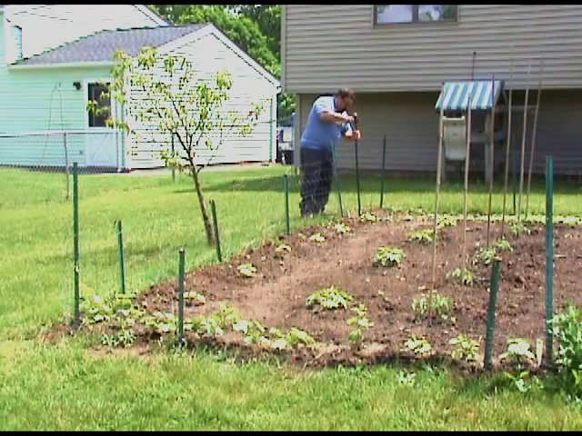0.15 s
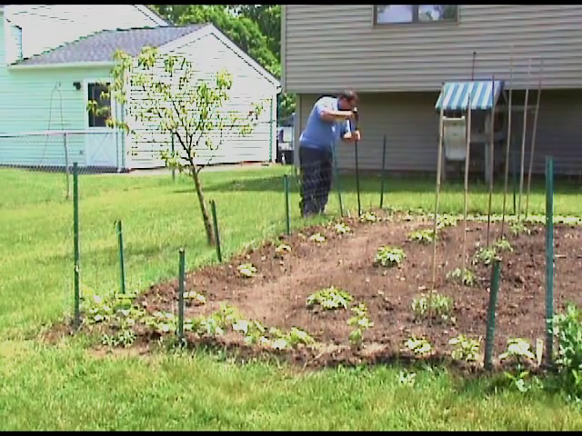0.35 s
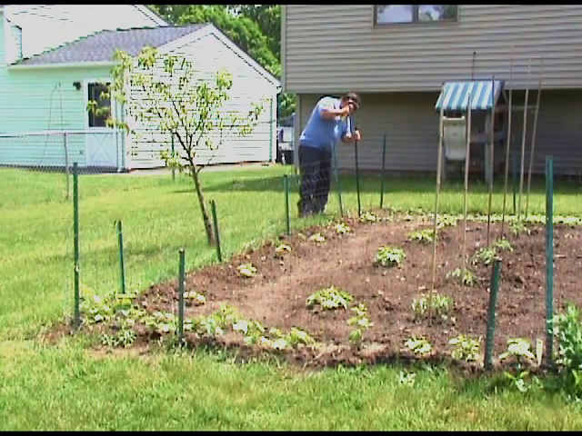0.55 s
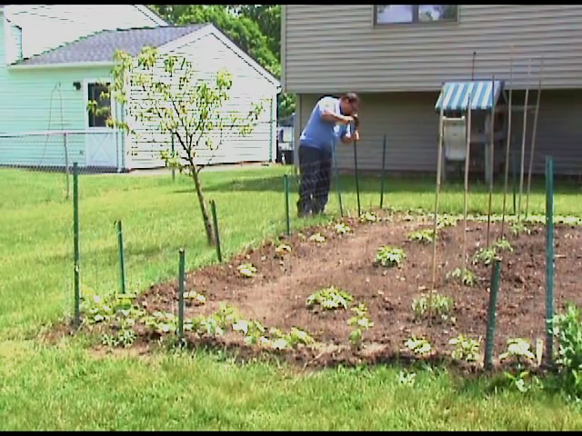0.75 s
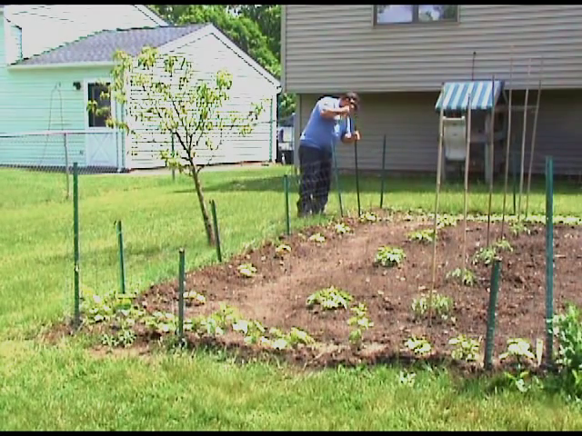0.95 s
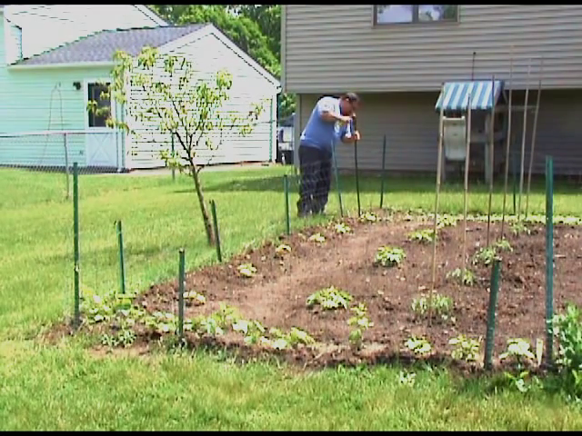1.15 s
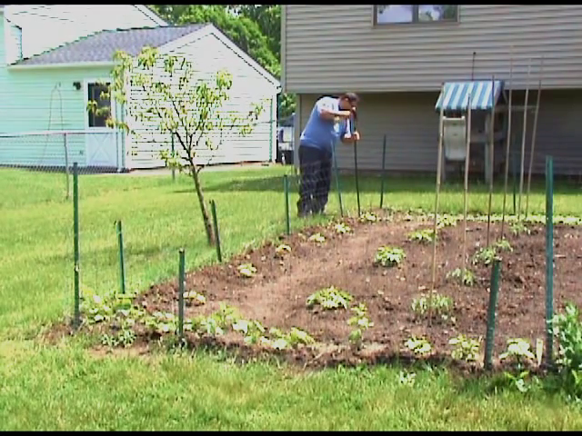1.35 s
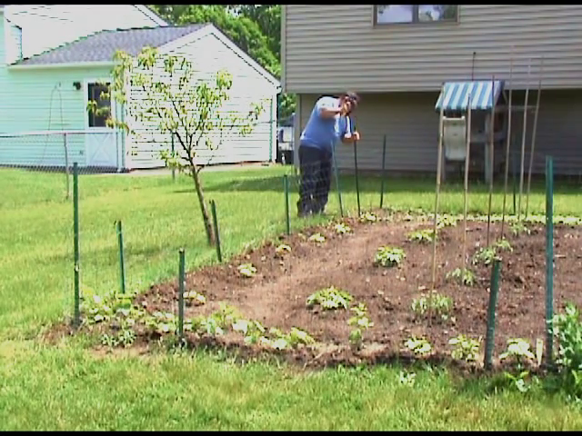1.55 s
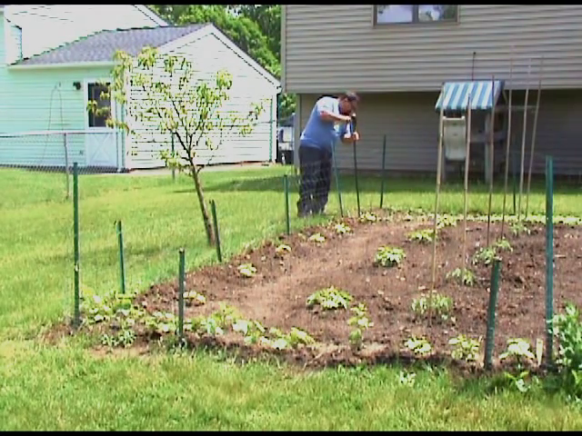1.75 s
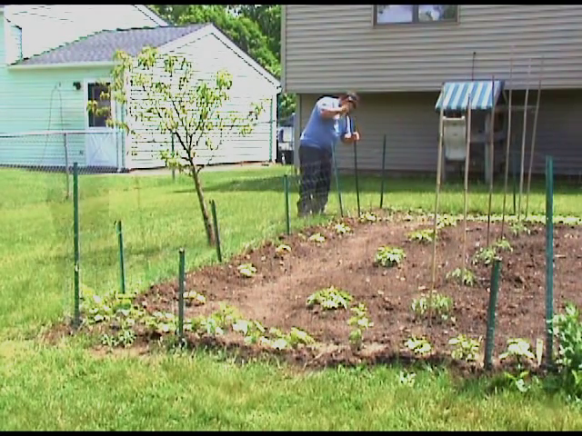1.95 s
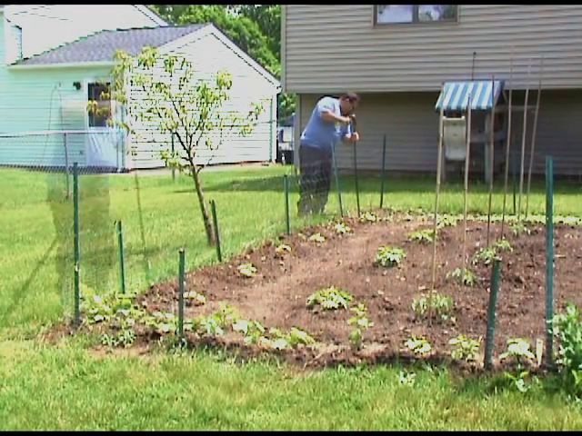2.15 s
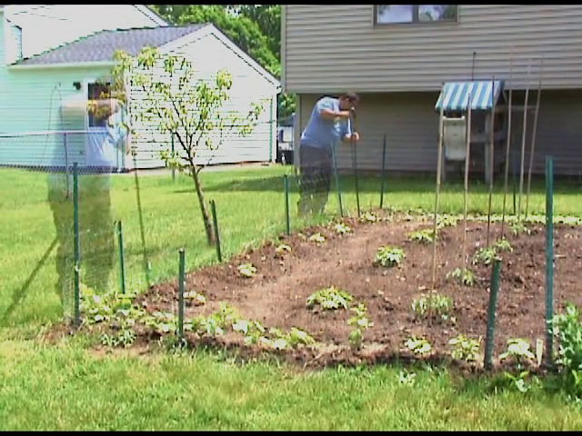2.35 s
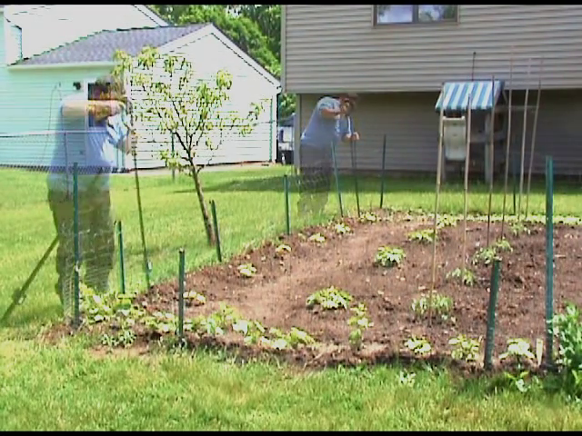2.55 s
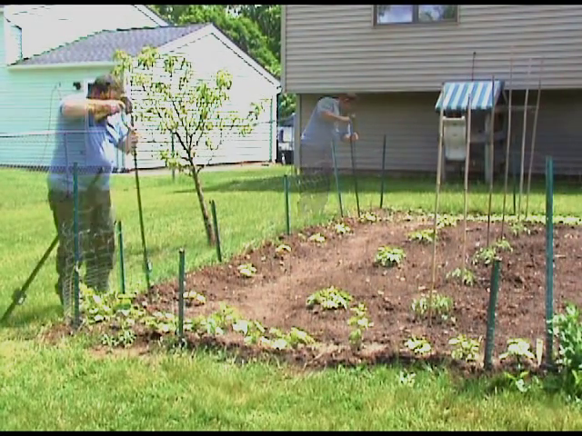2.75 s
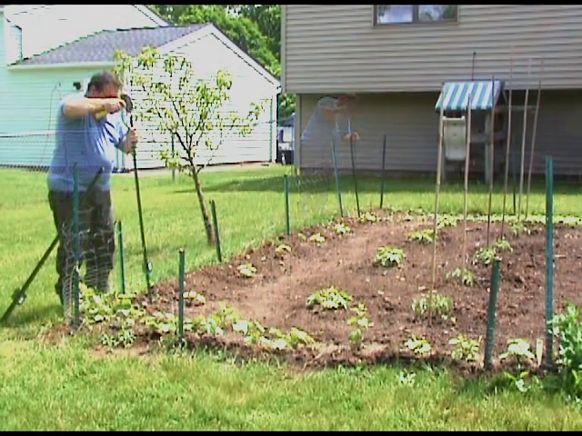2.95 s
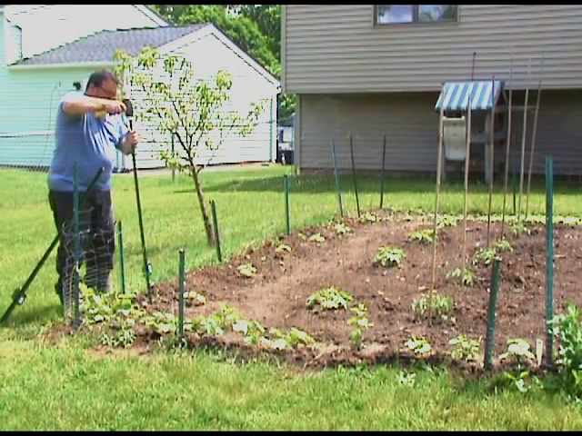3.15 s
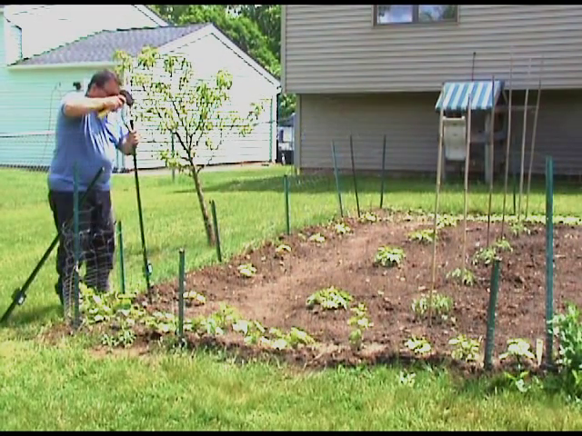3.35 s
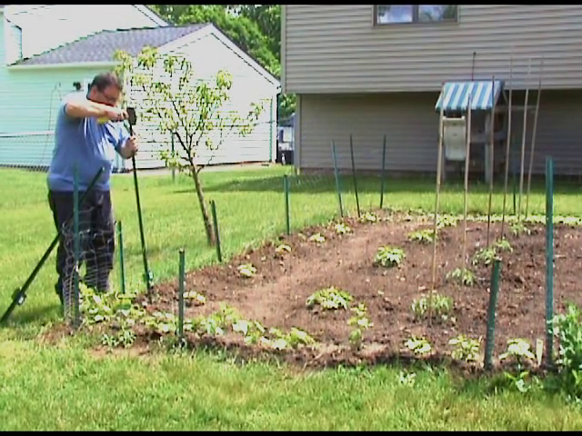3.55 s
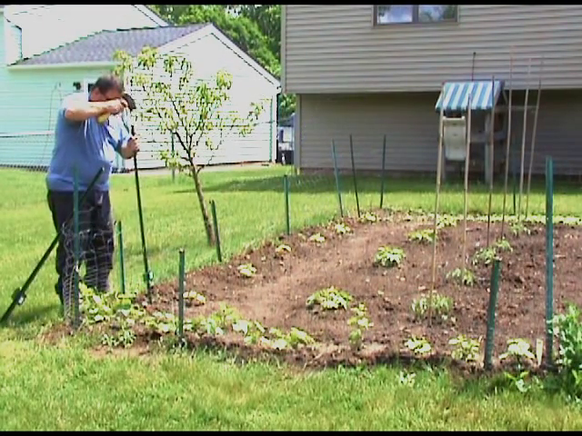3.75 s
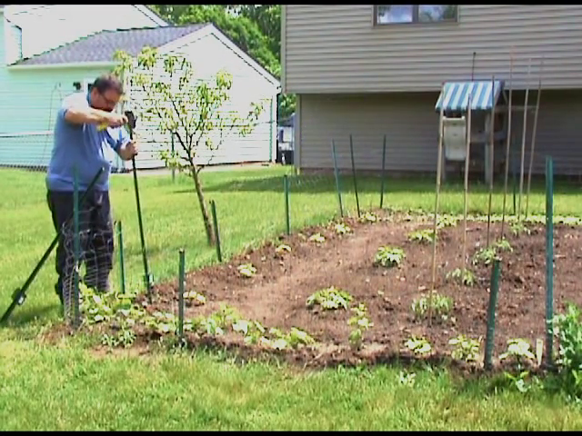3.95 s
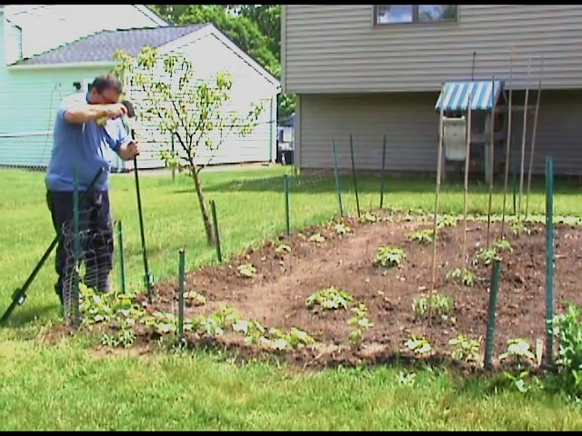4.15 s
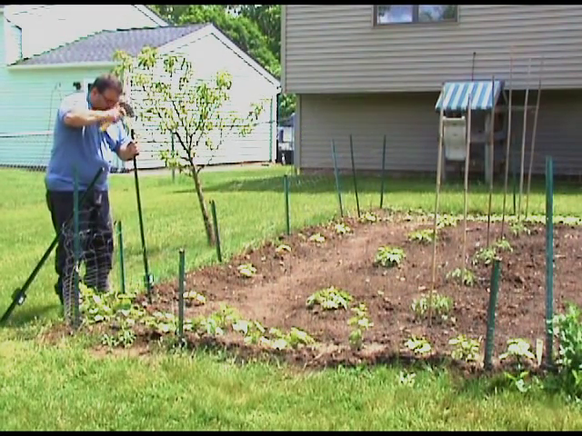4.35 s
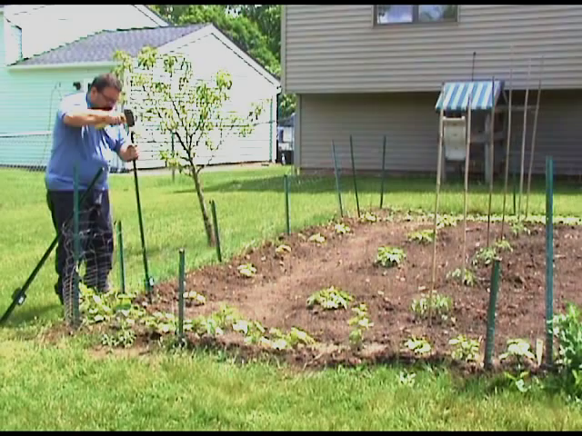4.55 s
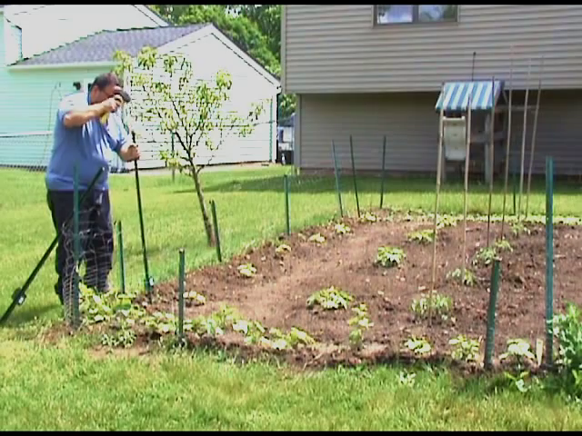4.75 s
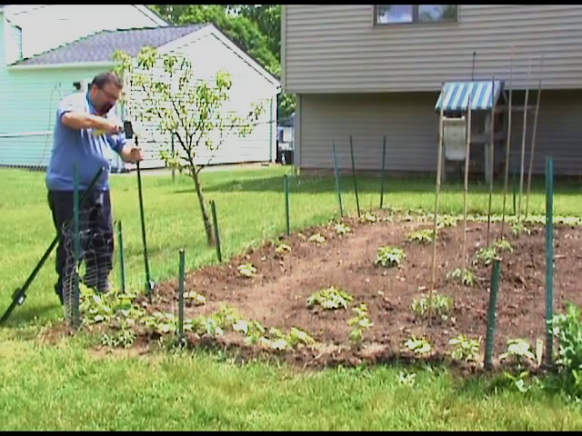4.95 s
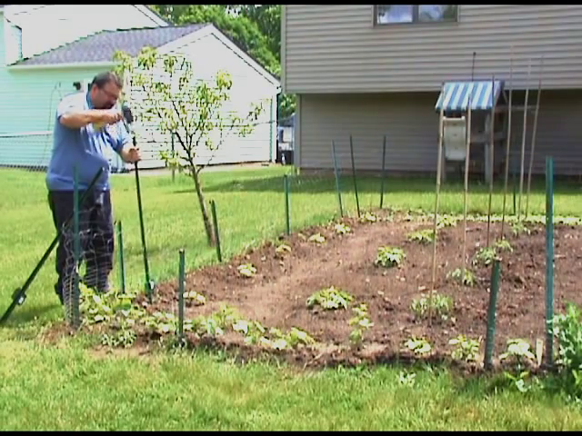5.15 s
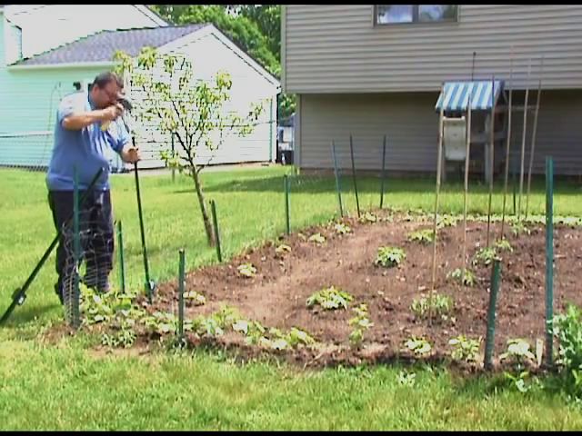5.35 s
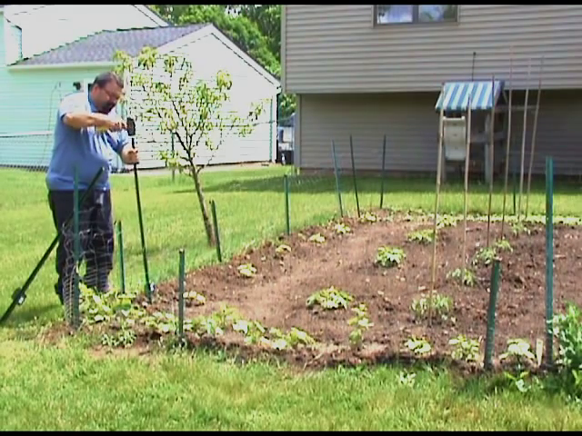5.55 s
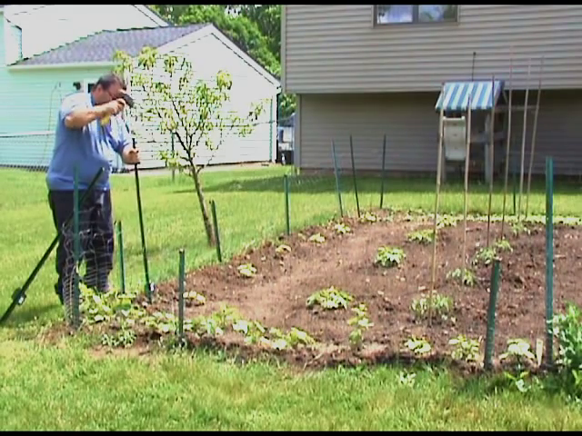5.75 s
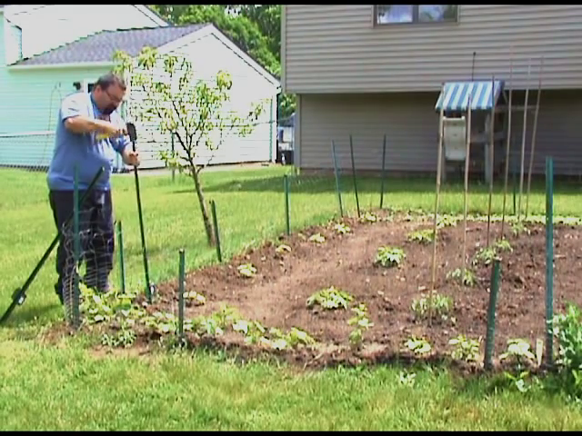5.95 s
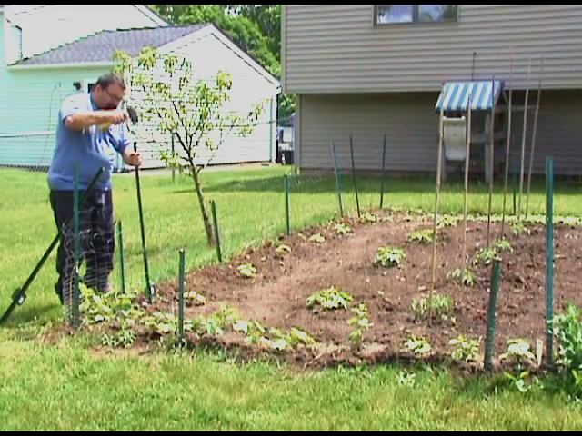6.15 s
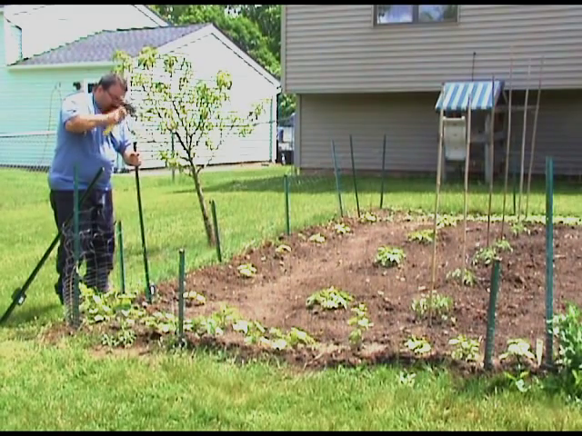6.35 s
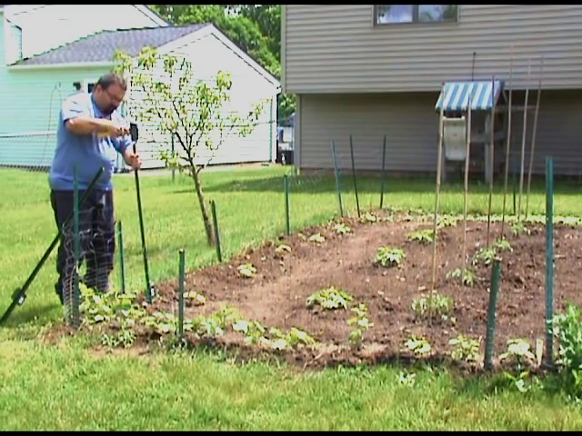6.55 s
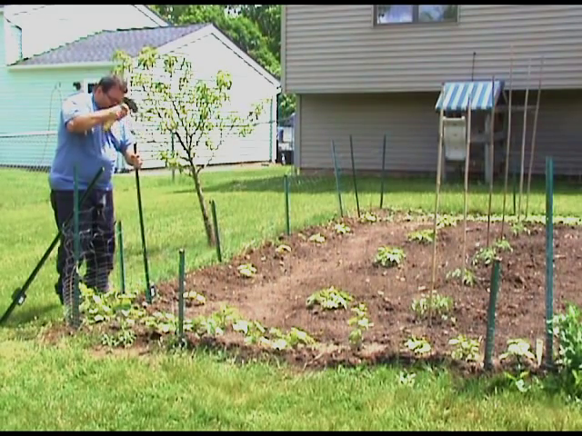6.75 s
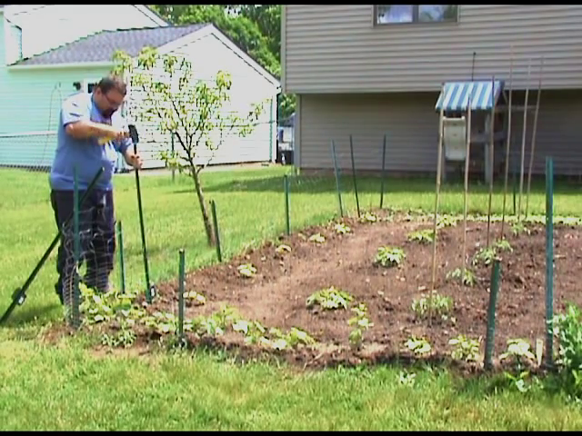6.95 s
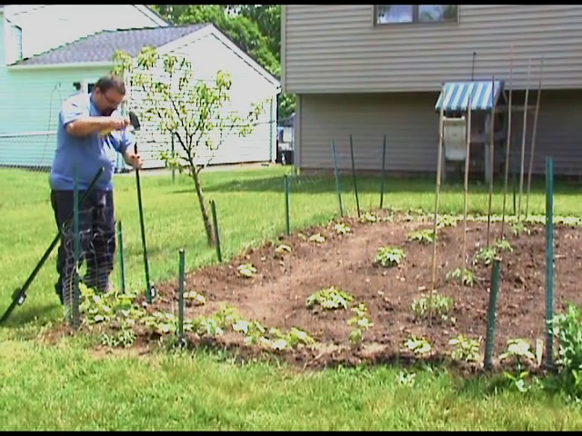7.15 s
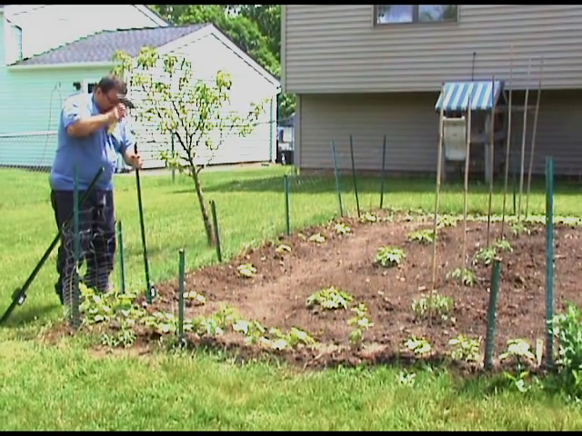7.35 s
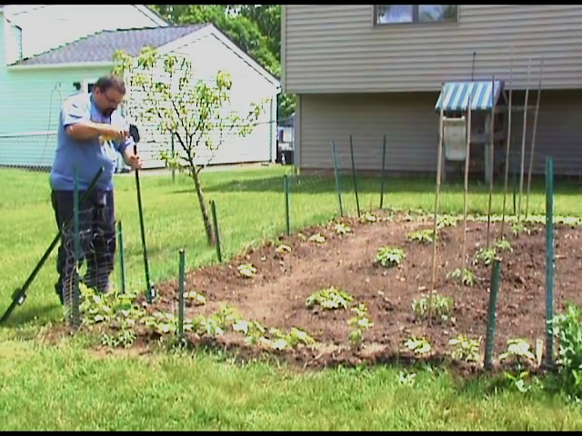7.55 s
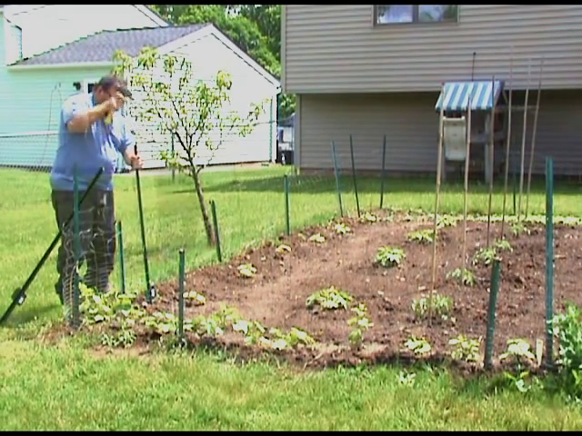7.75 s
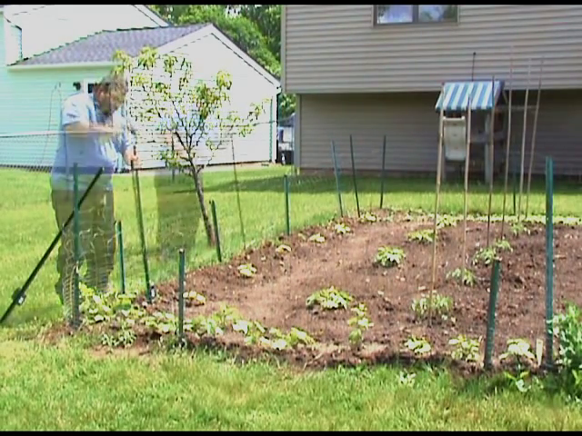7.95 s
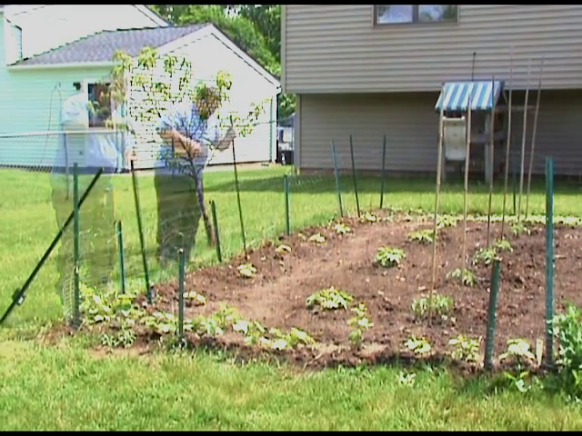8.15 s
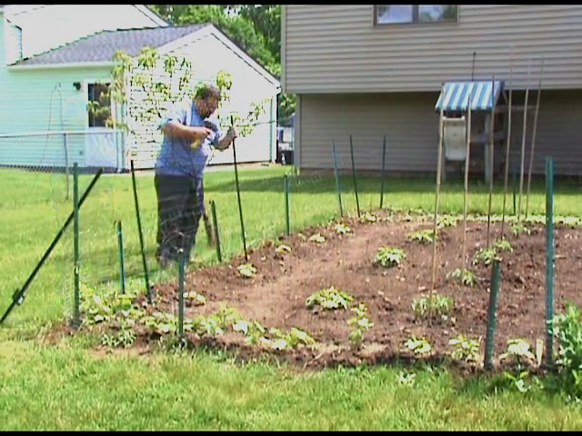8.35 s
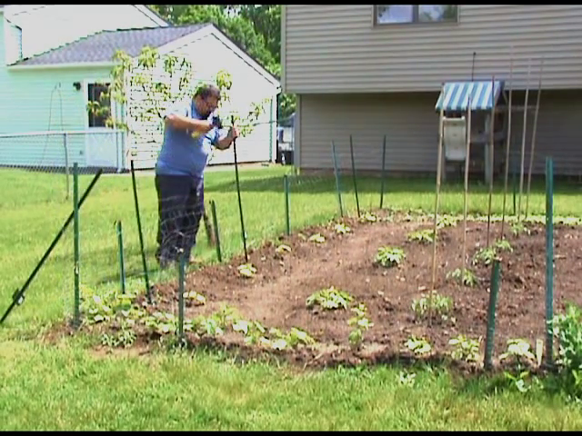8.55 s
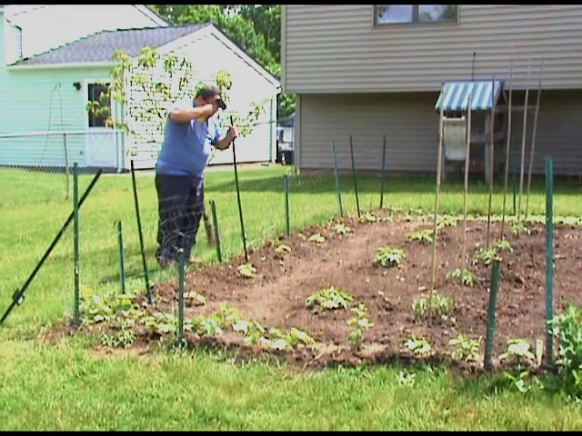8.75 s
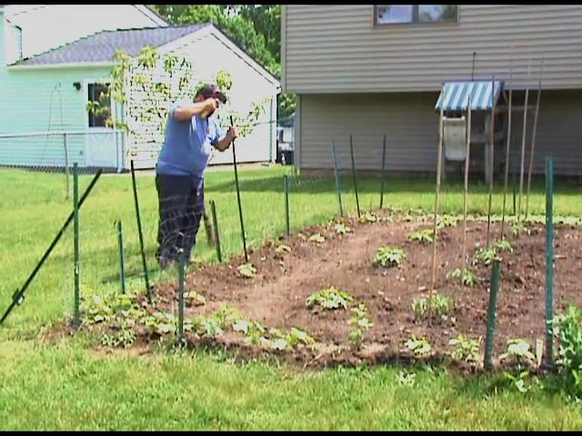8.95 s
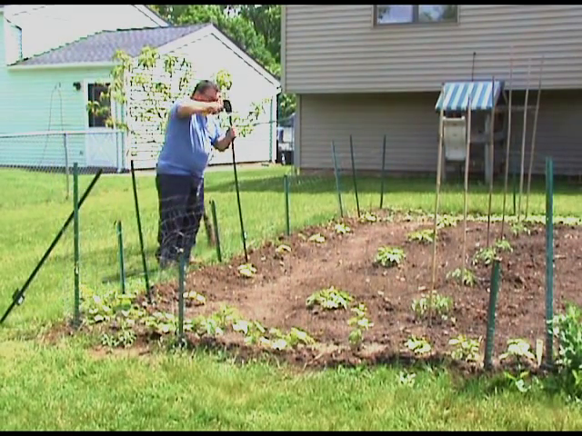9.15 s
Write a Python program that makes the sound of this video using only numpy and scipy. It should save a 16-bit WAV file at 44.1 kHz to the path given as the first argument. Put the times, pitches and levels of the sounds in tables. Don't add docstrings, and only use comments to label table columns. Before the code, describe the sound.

Outdoors in a yard between houses, the tail of an earlier blow fades at the start. From 0.3 s a hammer strikes a farther steel post every half second: hard, short, chattering clanks with hollow notes, small soil thuds and tight wall slaps, seven blows ending with a light tap at 3.3 s. A faint low motor idles and swells beneath, stopping around 2.8 s. At 3.15 s a nearer post enters softly, then full blows from 3.6 s to 8.1 s, roughly two per second, brighter and longer ringing, strongest near 6.1 and 7.6 s, each with a thin outdoor echo. Tiny chirps flick by at 3.8, 6.9 and 8.5 s; faint low engine drones pass around 5.3-6.6 and 6.9-8.2 s. Distant traffic and low wind rumble continue throughout, gusting near 3, 7.3 and 8.2 s. After the last blow its ring dies into quiet open air.

```python
import sys
import numpy as np
from scipy import signal
from scipy.fft import rfft, irfft
from scipy.io import wavfile
from scipy.ndimage import uniform_filter1d

SR = 44100
rng = np.random.default_rng(int(sys.argv[2]) if len(sys.argv) > 2 else 0)


def magnitude_from_level(level_db):
    exponent = np.asarray(level_db, float) / 20
    return 10 ** exponent


def dump(signal):
    limited = np.clip(np.atleast_2d(signal).T, -1, 1)
    pcm = np.round(limited * 32767).astype(np.int16)
    wavfile.write(sys.argv[1], SR, pcm)


N = 405719
LEAD = SR // 4
HIT = SR // 2
SHORT = HIT // 8
BURST = HIT // 4

# start in seconds, peak level in dB, then hammer ring, post body and
# brightness in dB against the peak band.
FAR_BLOWS = [
    (0.3114, -7.5, -13.5, -16.5, -16.5),
    (0.8144, -12, -14.5, -15, -19),
    (1.3179, -7, -20, -16.5, -18.5),
    (1.814, -8, -35, -31, -16.5),
    (2.3036, -8, -16, -17.5, -19),
    (2.803, -12.5, -17, -17.5, -18.5),
    (3.2954, -21, -20, -14.5, -19.5),
]
NEAR_BLOWS = [(3.1574, -25.5, -6.5, -10, -16.5), (3.5855, -12.5, -13, -13.5, -16),
              (4.0532, -7, -15, -16, -16.5), (4.5427, -9, -7.5, -13.5, -13.5),
              (5.0473, -5.5, -9.5, -16.5, -16.5), (5.5782, -7, -6, -10.5, -15.5),
              (6.072, -3, -14.5, -21.5, -17.5), (6.5681, -5, -14, -18, -11.5),
              (7.0791, -10, -14.5, -8, -13), (7.5845, -4.5, -26.5, -16, -14),
              (8.111, -9, -22, -12.5, -11.5)]
EARLIER_BLOW = (-.1925, -4, -19, -13, -8)
# frequency in Hz, level in dB, T60 in seconds.
POST_MODES = [(991, 7, 0.12), (1495, 13, 0.096), (1920, 6, 0.055), (2020, 11.5, 0.03), (2250, -14, .04),
              (2530, 0, 0.04), (2898, 2, 0.28), (3213, -0.5, 0.36), (3370, 2.5, 0.41), (3440, -4.5, 0.037),
              (3736, -12, 0.017), (4096, -3, 0.0064), (4510, -3, 0.0088), (4890, -6.5, 0.038),
              (5000, -9.5, 0.059), (5140, 5.5, 0.13), (5474, 1.5, 0.09), (5545, -15.5, 0.14),
              (6000, 2, 0.015), (6360, -10, 0.0073), (7040, -1, 0.0059), (7130, -5.5, 0.12),
              (7760, 0.5, 0.02), (8440, -0.5, 0.016), (8780, 0.5, 0.019), (9670, -2.5, 0.012),
              (10400, -39.5, 0.034), (12600, -41, .03), (13000, -41, .06), (13300, -25, .08)]
# frequency in Hz, level in dB.
HAMMER_PARTIALS = [(4136, 0), (4160, -8), (5670, -21.5), (12750, -46)]
# start in seconds, peak level in dB, frequency in Hz.
BENDS = [(0.3107, -11, 2130), (0.8138, -14, 1840), (1.3184, -20, 2210), (1.813, -21.5, 1590),
         (2.3032, -12.5, 2000), (2.8014, -18, 1960), (3.1562, -20, 1900), (3.2959, -23, 1500),
         (3.5862, -6.5, 1904), (4.0532, -13.5, 1990), (4.5446, -5, 2006), (5.0479, -7.5, 2174),
         (5.5774, -6.5, 1920), (6.0716, -13, 2530), (6.5698, -20.5, 2500), (7.0788, -4.5, 2240),
         (7.5842, -5, 2247), (8.11, -7, 2530), (0.8165, -4, 4170), (1.816, -6.5, 4400), (5.048, -9, 3280),
         (7.5845, -25, 3420)]
# start in seconds, peak level in dB, centre in Hz,
# level of the upper knock in dB.
THUDS = [(0.313, -29, 301, -50), (0.811, -22, 129, -6), (1.318, -22, 124, -9.5), (1.813, -24, 129, -9),
         (2.303, -22, 127, -16), (2.803, -27, 129, -9), (4.545, -46, 116, 11), (6.571, -32.5, 328, -25),
         (7.077, -22, 132, -34), (7.579, -23.5, 127, -13), (8.11, -27, 161, -28)]
# delay in seconds, level in dB, smear in seconds,
# left minus right in dB.
FAR_WALLS = [(.029, -9, 0.0066, -0.5), (.034, -18, 0.0077, -1), (.072, -28.5, 0.0085, 10),
             (.113, -31.5, 0.0051, 1), (.210, -28.5, 0.0009, 5.5), (.247, -53.5, 0.0079, 36),
             (.283, -33, 0.018, -2), (.298, -41.5, 0.023, -1), (.355, -46, 0.025, 5)]
NEAR_WALLS = [(.022, -42, 0.0032, -8), (.054, -18.5, 0.0052, 0), (.105, -30.5, 0.017, 2),
              (.133, -34, 0.009, 7), (.166, -32, 0.014, 5), (.209, -29, 0.0045, 5.5),
              (.240, -40, .006, -1.5), (.283, -37, .010, 0), (.297, -38, .010, -3.5),
              (.345, -45, 0.012, -3)]
# centre in Hz, level in dB, T60 in seconds.
YARD_TAIL = [(500, -26.5, 0.099), (1000, -32.5, 0.47), (1750, -23, 1), (4120, -18, 0.95), (7500, -20, 0.64),
             (12600, -8, 0.36)]
# start in seconds, length in seconds, level in dB.
SURGES = [
    (-.2, 0.57, -41),
    (0.567, 0.9, -47),
    (1.356, 0.26, -57),
    (1.67, 0.18, -47),
    (2.04, 0.63, -48.5),
]
# multiple of the base note, level in dB.
HUM_ORDERS = [(1, 0), (2, -17), (3, -20)]
# start in seconds, length in seconds, frequency in Hz, level in dB.
DRONES = [
    (6.9, 1.3, 121, -50),
    (6.9, 1.3, 240, -56),
    (5.3, 1.3, 77, -51),
]
# start in seconds, length in seconds, from Hz, to Hz, level in dB.
CHIRPS = [(3.794, .018, 3100, 3600, -51), (3.826, .018, 3250, 3750, -55), (3.852, .012, 3500, 3200, -53),
          (6.911, .012, 4300, 5200, -47), (6.925, .012, 4900, 4500, -49), (6.936, .016, 4000, 5400, -44),
          (6.951, .013, 5400, 3900, -46), (6.957, .018, 3200, 3550, -46), (6.969, .014, 4150, 4400, -45),
          (6.992, .014, 3350, 3700, -48), (8.418, .03, 4150, 3750, -54), (8.45, .014, 3750, 4050, -53),
          (8.472, .02, 3250, 3150, -57), (8.555, .03, 3200, 2900, -57)]
# frequency in Hz, level in dB per Hz.
AIR_COLOUR = [(15, -41), (25, -18), (71, -3), (97, -5), (150, -4.5), (176, -15), (234, 0), (311, -18.5),
              (437, -15.5), (597, -13.5), (754, -10), (1170, -10.5), (2840, -22.5), (8460, -39.5),
              (12500, -37), (16200, -61.5), (22000, -120)]
# frequency in Hz, side minus mid in dB.
AIR_SIDE = [(30, -10), (60, -7), (120, -8), (300, -12), (700, -10), (1500, -8), (3000, -7), (6000, -6),
            (12000, -14)]
# time in seconds, level in dB against its usual level.
TRAFFIC = [(0, 0), (1.6, -1.5), (2.5, 1), (3.5, 2), (4.8, 1), (6.5, 2), (7.6, 3), (8.5, 0.9), (9.2, 0.3)]
# middle in seconds, length in seconds, level in dB over calm.
GUSTS = [
    (0.406, 0.34, 6),
    (1.2, 0.94, 4.5),
    (2.038, 0.29, 8),
    (2.95, 0.73, 12.5),
    (3.5, 0.2, 2),
    (5.693, 0.39, 4.5),
    (6.3, 1.1, 2.5),
    (7.3, 0.88, 12),
    (8.15, 1.04, 18),
]


def fade(length, t60):
    return np.exp(-np.log(1000) * np.arange(length) / (np.maximum(t60, .002) * SR))


def band(x, lo_hz, hi_hz):
    return signal.sosfilt(signal.butter(2, [lo_hz, min(hi_hz, .45 * SR)], "bandpass", fs=SR, output="sos"), x)


def unit(x):
    return x / np.sqrt(np.mean(x ** 2))


def walk(rate, size=N):
    hold = int(SR / rate)
    steps = np.repeat(rng.standard_normal(size // hold + 1), hold)
    return 1.3 * uniform_filter1d(uniform_filter1d(steps, hold), hold)[:size]


def hammer_ring(ring_db, ring_t60):
    t = np.arange(HIT) / SR
    phases = 2 * np.pi * rng.random(len(HAMMER_PARTIALS))
    swing = walk(45, size=HIT)
    wobble = .9 * swing[::-1]
    ring = sum(magnitude_from_level(db) * np.sin(2 * np.pi * hz * t + phase + wobble)
               for (hz, db), phase in zip(HAMMER_PARTIALS, phases))
    ring = magnitude_from_level(ring_db + 6.0) * ring * fade(HIT, ring_t60) * (1 - fade(HIT, 0.0073))
    return ring * magnitude_from_level(1.8 * swing)


def post_colour(bins, ring_db, body_db, bright_db):
    hz, db, t60 = np.repeat(np.transpose(POST_MODES), 3, axis=1)
    hz = hz * (1 + .018 * rng.standard_normal(len(hz)))
    db = db + np.interp(np.log(hz), np.log([2300, 2900, 5390, 6700]), [body_db, 0, 0, bright_db + 4.5])
    lasting = .45
    width = np.log(1000) / (2 * np.pi * lasting * t60)
    peaks = (magnitude_from_level(db) * width)[:, None] ** 2 / (width[:, None] ** 2 + (bins - hz[:, None]) ** 2)
    dull_db = np.clip(.55 * (ring_db + 11.0), -5, 9)
    return np.sqrt(np.sum(peaks, axis=0)) * magnitude_from_level(np.interp(bins, [9500, 11500], [0, -dull_db]))


def blow(ring_db, body_db, bright_db, ring_t60, chatter_t60):
    scrape = rng.laplace(size=SHORT) * fade(SHORT, chatter_t60) * (1 - fade(SHORT, 0.013))
    chatter = rfft(scrape, 2 * SHORT)
    bins = np.arange(len(chatter)) * SR / (2 * SHORT)
    colour = post_colour(bins, ring_db, body_db, bright_db)
    ring = hammer_ring(ring_db, ring_t60)
    out = np.array([ring, magnitude_from_level(-8.5) * ring])
    for k, even in enumerate((.35, .75)):
        post = band(irfft(colour * chatter / np.abs(chatter) ** even)[:SHORT], 570, 13000)
        out[k, :SHORT] += magnitude_from_level(20.5) * post / np.sqrt(np.sum(band(post, 2400, 8000) ** 2))
    return out


def ports(x, pan_db, lean_db, lead_db):
    treble = magnitude_from_level(lean_db) * band(x, 5500, 11000)
    side = treble + magnitude_from_level(lead_db) * (np.roll(x, -2) - np.roll(x, 2))
    return x * magnitude_from_level(np.array([[pan_db], [-pan_db]]) / 2) + side * np.array([[1], [-1]])


def hammering(blows, response, aim, chatter_t60, ring_t60):
    dry = np.zeros((2, LEAD + N + HIT))
    for s, peak_db, *colour in blows:
        start = LEAD + int((s - .0015) * SR)
        free_t60 = ring_t60 * np.exp(.04 * peak_db)
        dry[:, start:start + HIT] += magnitude_from_level(peak_db) * blow(*colour, free_t60, chatter_t60)
    direct = ports(dry[0], *aim)
    return direct[:, LEAD:LEAD + N] + signal.fftconvolve(dry[1:], response, axes=1)[:, LEAD:LEAD + N]


def bends():
    out, t = np.zeros(N + HIT), np.arange(BURST) / SR
    for s, peak_db, hz in BENDS:
        note = np.sin(2 * np.pi * hz * t) * fade(BURST, 0.029) * (1 - fade(BURST, 0.021))
        out[int(s * SR):int(s * SR) + BURST] += magnitude_from_level(peak_db) * note
    return out[:N]


def thuds():
    out = np.zeros(N + HIT)
    for s, peak_db, hz, knock_db in THUDS:
        push = rng.standard_normal((2, BURST))
        thump = band(push[0] * fade(BURST, 0.072) * (1 - fade(BURST, 0.016)), hz / 3.04, hz * 1.46)
        thump = band(thump, 88, 4 * hz)
        knock = band(push[1] * fade(BURST, 0.057), 330, 800)
        both = thump / np.abs(thump).max() + magnitude_from_level(knock_db) * knock / np.abs(knock).max()
        out[int(s * SR):int(s * SR) + BURST] += magnitude_from_level(peak_db + 2.5) * both
    return np.array([out[:N], np.roll(out, 12)[:N]])


def yard(walls, tail_db, wide):
    length = 3 * SR // 4
    out = np.zeros((2, length))
    spread = np.array([[1, wide], [1, -wide]])
    for delay, db, smear, lean_db in walls:
        slap = rng.standard_normal((2, BURST)) * fade(BURST, 4 * smear)
        slap = band(spread @ slap, 300 + 5500 * delay, 14000 / (1 + 6 * delay))
        slap = slap / np.sqrt(np.sum(slap ** 2, axis=1, keepdims=True))
        start = int(delay * SR)
        out[:, start:start + BURST] += slap * magnitude_from_level(db + np.array([[lean_db], [-lean_db]]) / 2)
    for hz, db, t60 in YARD_TAIL:
        noise = spread @ rng.standard_normal((2, length))
        scatter = unit(band(noise, hz / np.sqrt(2), hz * np.sqrt(2)))
        out += magnitude_from_level(db + tail_db - 34.5) * scatter * fade(length, t60) * (1 - fade(length, 0.026))
    return out


def hum():
    t = np.arange(N) / SR
    base_hz = 58.4 - 2.34 * np.maximum(t - 0.95, 0)
    turn = 2 * np.pi * np.cumsum(base_hz) / SR

    def edge(x):
        return np.clip(x / 0.1, 0, 1)

    load = sum(magnitude_from_level(db) * edge(t - s) * edge(s + length - t) for s, length, db in SURGES)
    idle = magnitude_from_level(-49) * edge(2.8 - t)
    load = (load + idle) * magnitude_from_level(0.95 * walk(7.98))
    return np.sqrt(2) * load * sum(magnitude_from_level(db) * np.sin(k * turn) for k, db in HUM_ORDERS)


def drones():
    t, out = np.arange(N) / SR, 0
    for s, length, hz, db in DRONES:
        swell = np.sin(np.pi * np.clip((t - s) / length, 0, 1)) ** .5 * magnitude_from_level(db + 2.5 * walk(9.4))
        wavering_hz = hz * (1 + 0.0117 * walk(3.7))
        out = out + swell * np.sin(2 * np.pi * np.cumsum(wavering_hz) / SR)
    return out


def birds():
    song = np.zeros(N)
    for s, length, from_hz, to_hz, db in CHIRPS:
        n = int(length * SR)
        turn = 2 * np.pi * np.cumsum(np.linspace(from_hz, to_hz, n)) / SR
        song[int(s * SR):int(s * SR) + n] += magnitude_from_level(db) * np.sqrt(np.hanning(n)) * np.sin(turn)
    song = song * magnitude_from_level(4.5 + 3 * walk(300))
    blur = rng.standard_normal((2, BURST)) * fade(BURST, .17) * magnitude_from_level(-31)
    return magnitude_from_level(-1) * song + signal.fftconvolve(song[None], blur, axes=1)[:, :N]


def air():
    t = np.arange(N) / SR
    traffic = np.interp(t, *np.transpose(TRAFFIC))
    wind = sum(db * np.exp(-(2 * (t - s) / length) ** 2) for s, length, db in GUSTS)
    rumble = -2.5 + wind
    low = 0.9 + 0.24 * wind + 0.6 * traffic
    colour_hz, colour_db = np.transpose(AIR_COLOUR)
    width_hz, width_db = np.transpose(AIR_SIDE)
    out = 0
    for hz in 25 * 2 ** np.arange(0, 9.1, .5):
        mid, side = unit(band(rng.standard_normal((2, N)), hz / 2 ** .25, hz * 2 ** .25))
        db = np.interp(np.log(hz), np.log(colour_hz), colour_db)
        side_db = np.interp(np.log(hz), np.log(width_hz), width_db)
        motion = rumble if hz < 100 else low if hz < 350 else traffic
        flicker = min(2.5, 300 / hz + 0.35) * walk(11)
        level = magnitude_from_level(db + 10 * np.log10(hz) + motion + flicker)
        out = out + level * (mid + magnitude_from_level(side_db) * side * np.array([[1], [-1]]))
    return magnitude_from_level(-71.5) * out


def scene():
    far_yard = yard(FAR_WALLS, tail_db=0.61, wide=0.33)
    near_yard = yard(NEAR_WALLS, tail_db=-2.5, wide=0.32)
    # pan, treble lean and time lead towards the left port, all in dB
    far = hammering([EARLIER_BLOW, *FAR_BLOWS], far_yard, aim=(-.5, -20, -28.5),
                    chatter_t60=0.043, ring_t60=.26)
    near = hammering(NEAR_BLOWS, near_yard, aim=(.9, -15.5, -25.5), chatter_t60=0.058, ring_t60=.42)
    note = bends()
    lean_db = 4 * (np.arange(N) > 3.1 * SR) * np.array([[1], [-1]]) / 2
    note = note * magnitude_from_level(lean_db) + magnitude_from_level(-3.0) * signal.fftconvolve(note[None], near_yard, axes=1)[:, :N]
    return far + near + note + thuds() + air() + hum() + birds() + drones()


def roll_off(x):
    return signal.sosfilt(signal.butter(12, 15630, fs=SR, output="sos"), x)


def record(dry):
    loud = .93 * dry / (1 + dry ** 4) ** .25
    strong = np.clip(uniform_filter1d(np.abs(loud), size=1024) / 0.06, 0, 1) ** 2
    edge = signal.cheby1(10, 1, 13100, fs=SR, output="sos")
    kept = signal.sosfiltfilt(edge, loud)
    top = magnitude_from_level(-7) * strong * band(loud - kept, 14000, 14200)
    return roll_off(kept + top)


dry = scene()
out = record(dry)
dump(out)
```